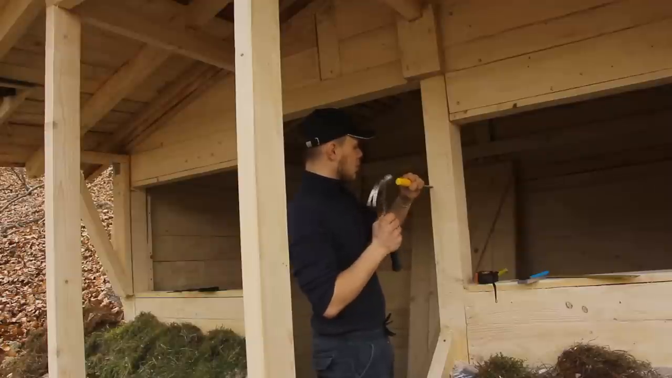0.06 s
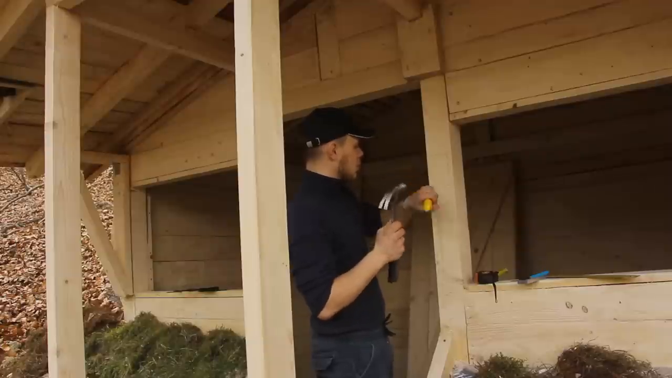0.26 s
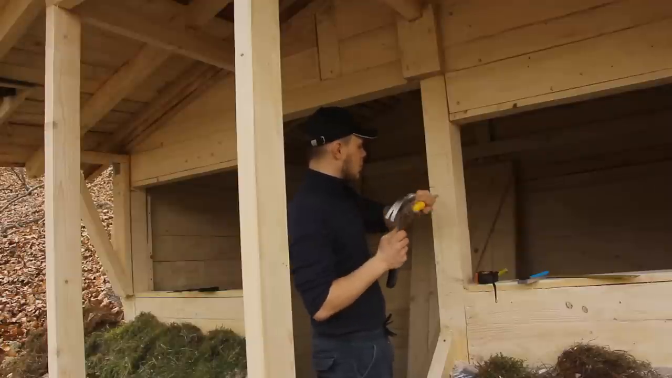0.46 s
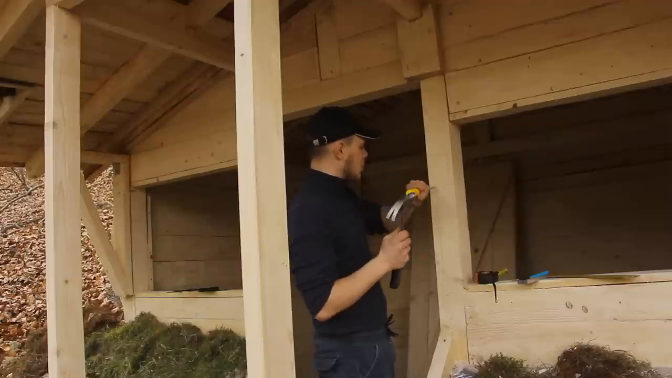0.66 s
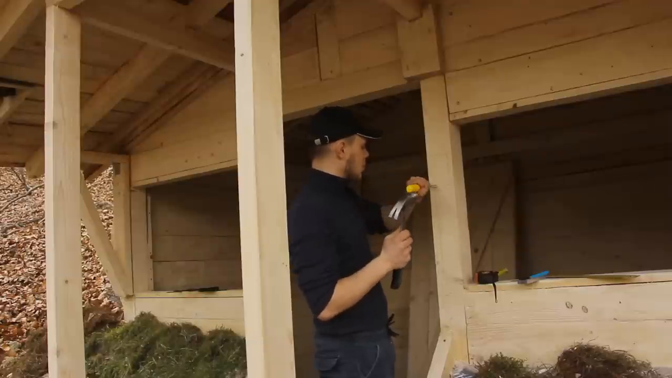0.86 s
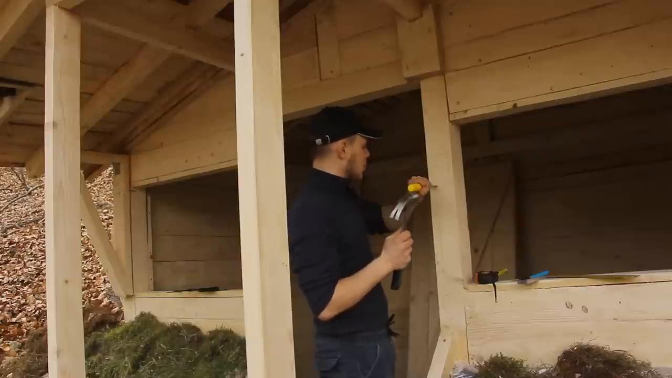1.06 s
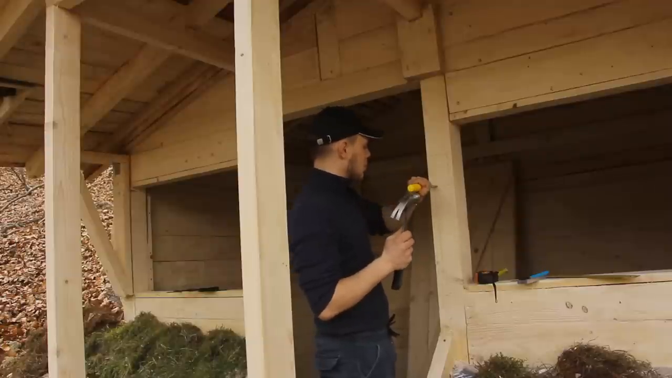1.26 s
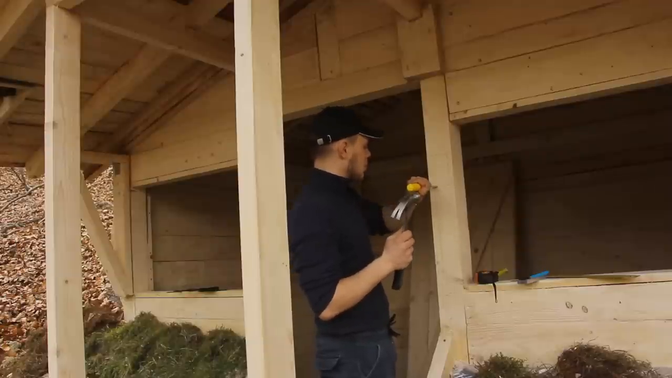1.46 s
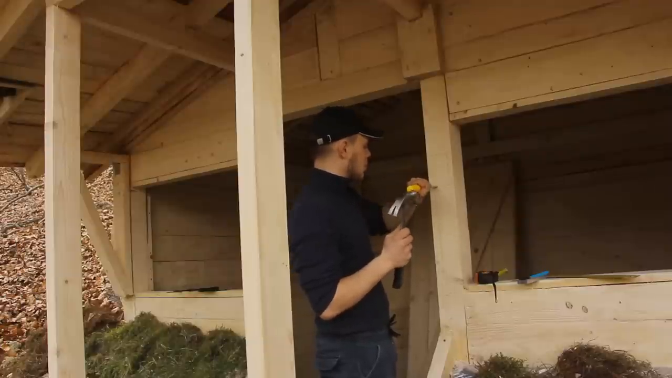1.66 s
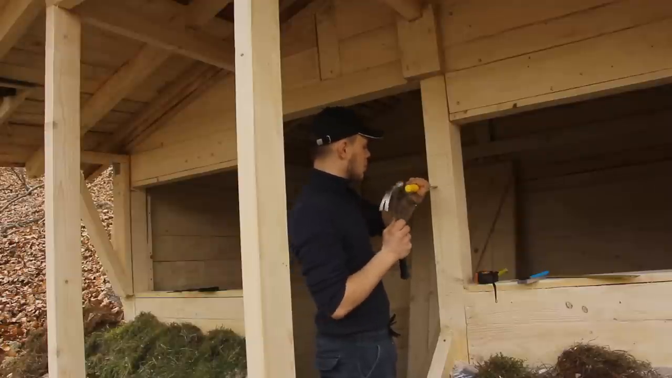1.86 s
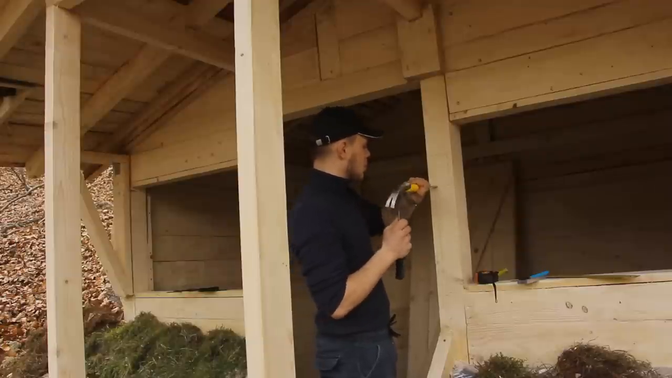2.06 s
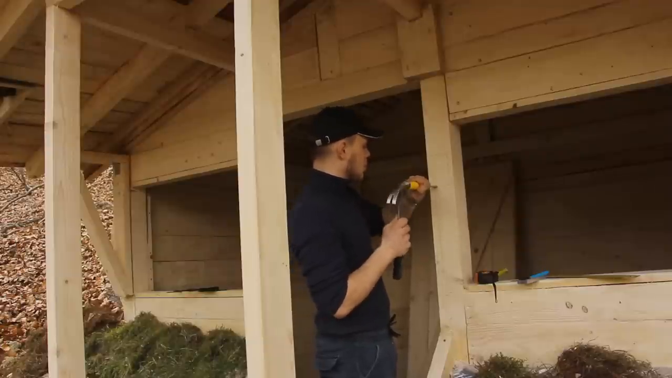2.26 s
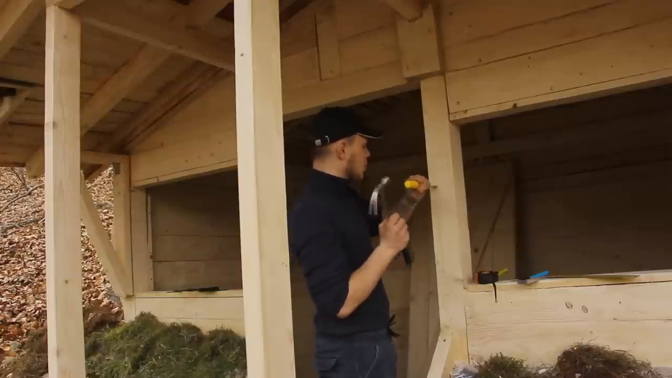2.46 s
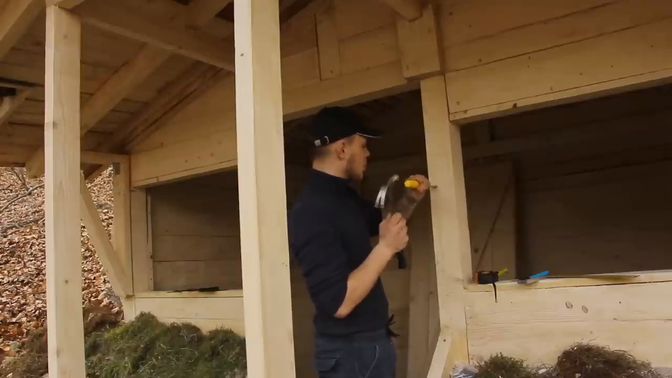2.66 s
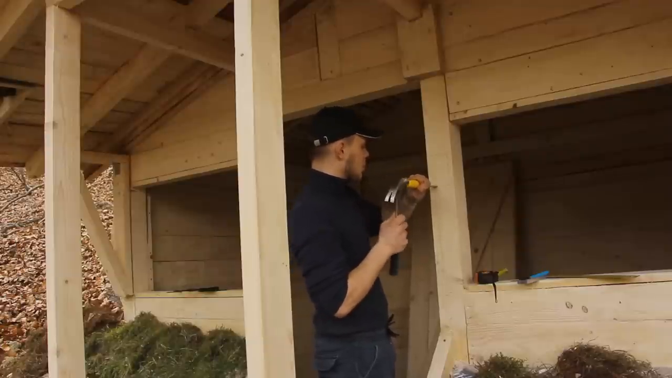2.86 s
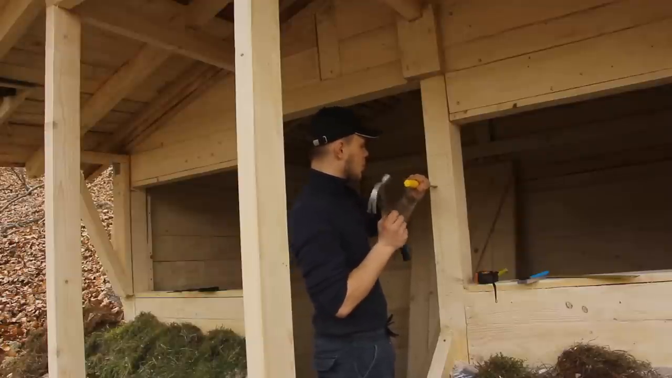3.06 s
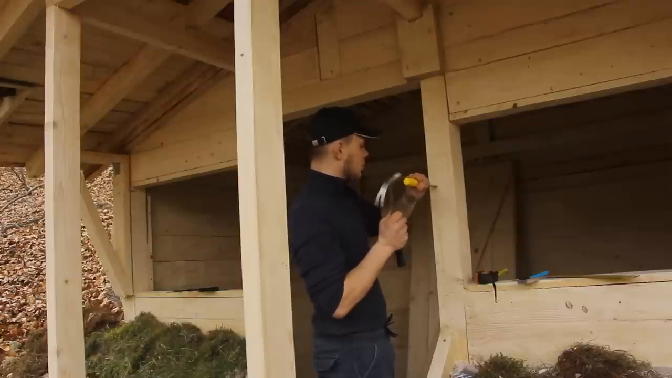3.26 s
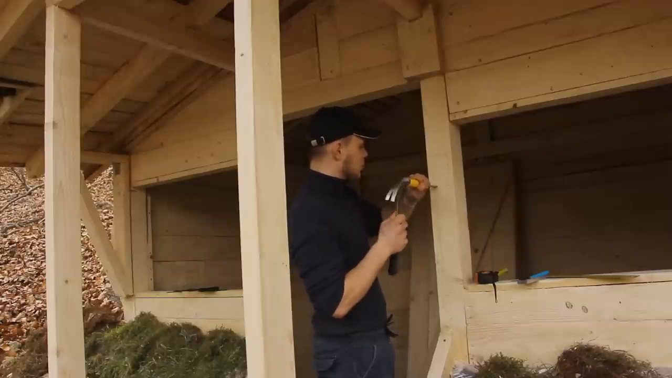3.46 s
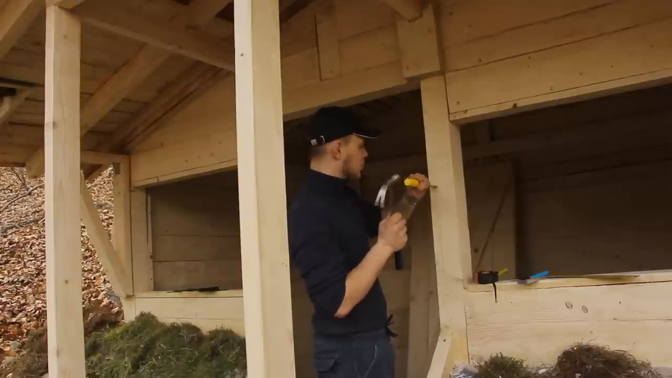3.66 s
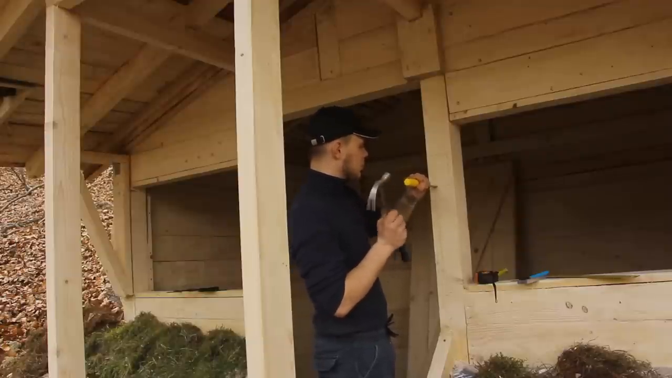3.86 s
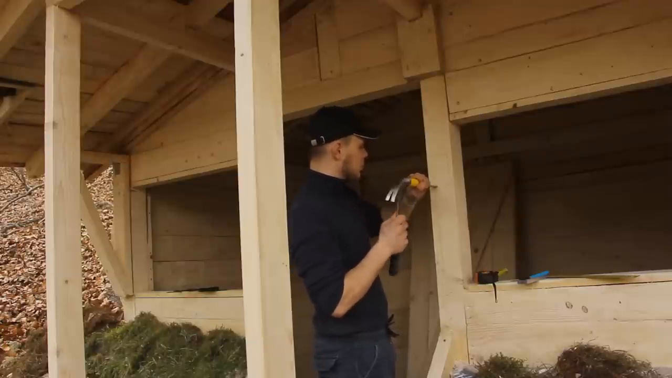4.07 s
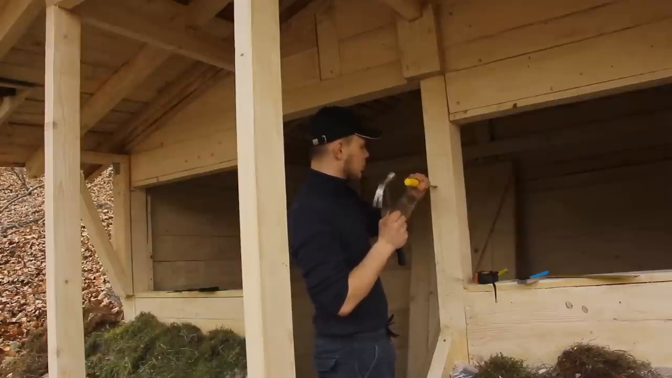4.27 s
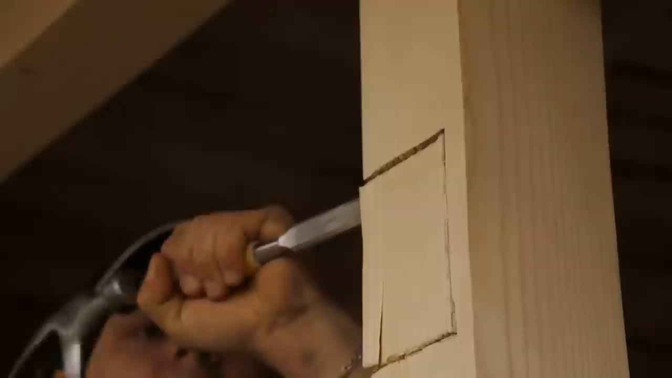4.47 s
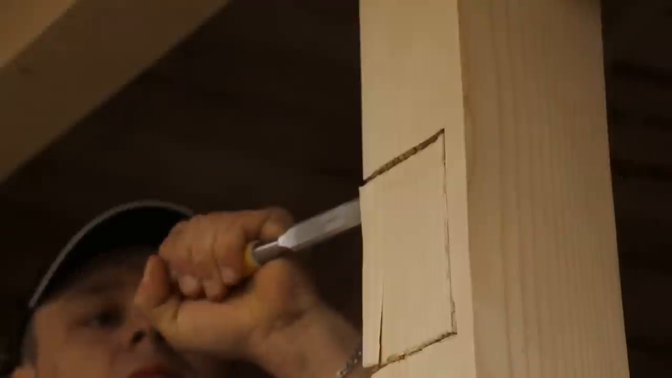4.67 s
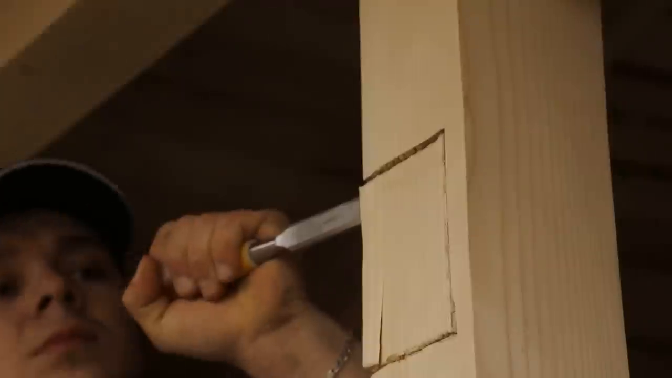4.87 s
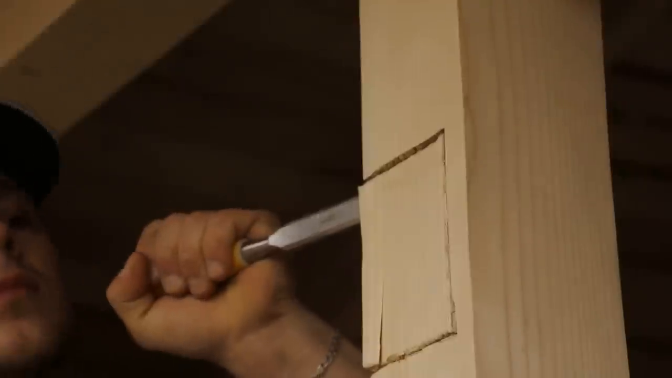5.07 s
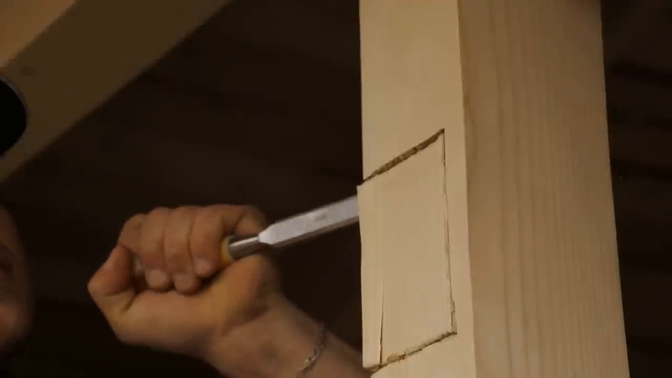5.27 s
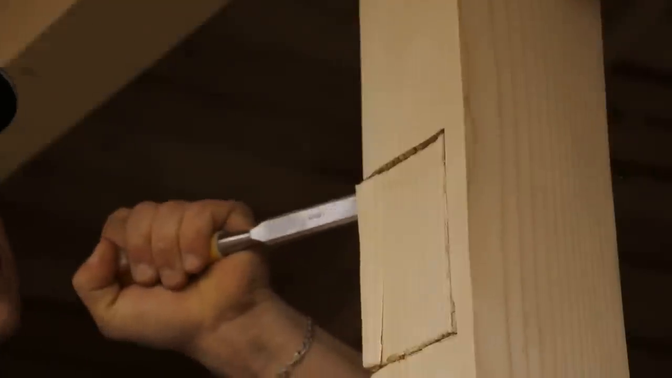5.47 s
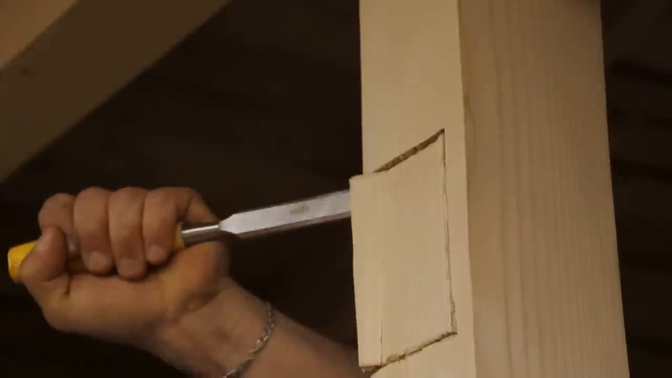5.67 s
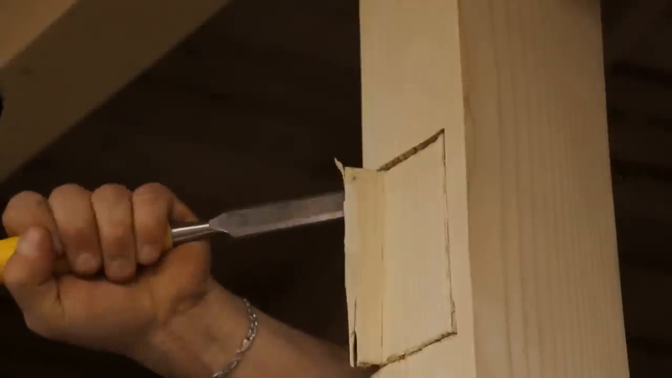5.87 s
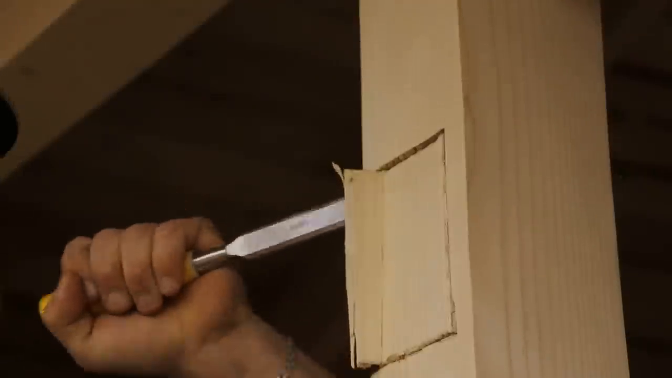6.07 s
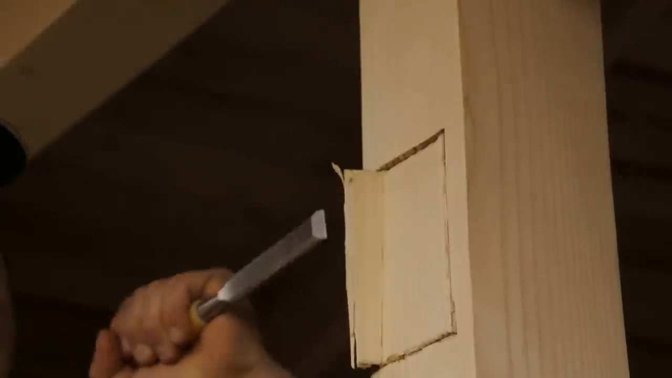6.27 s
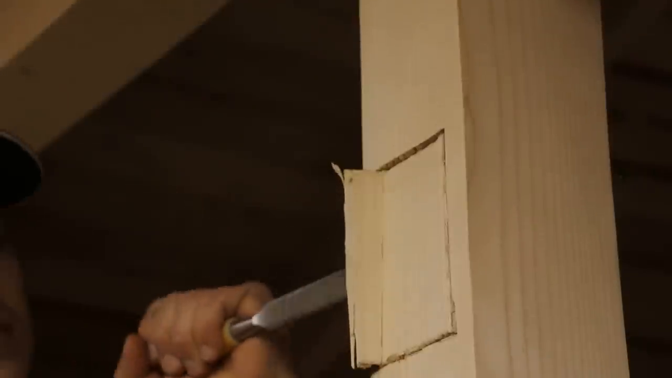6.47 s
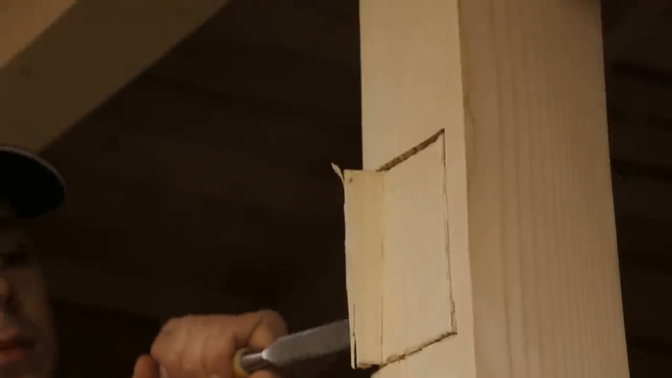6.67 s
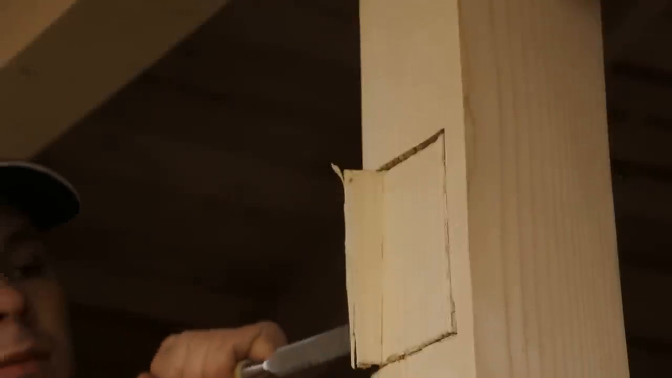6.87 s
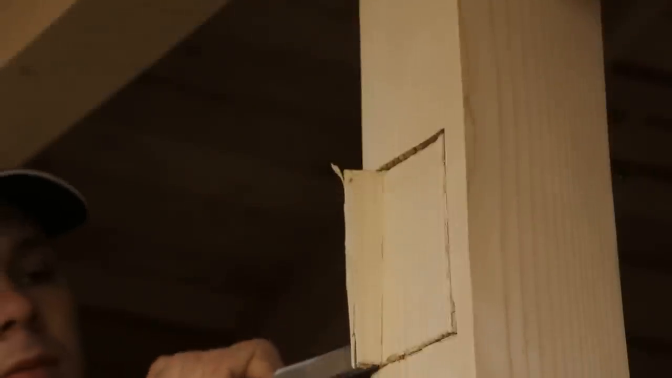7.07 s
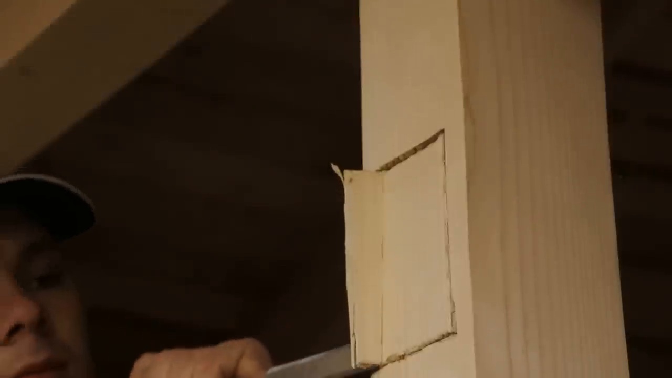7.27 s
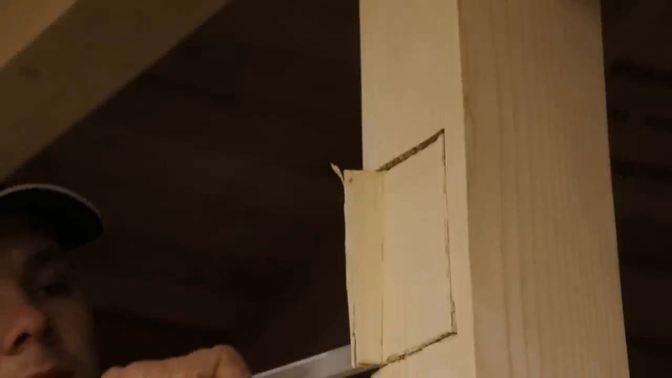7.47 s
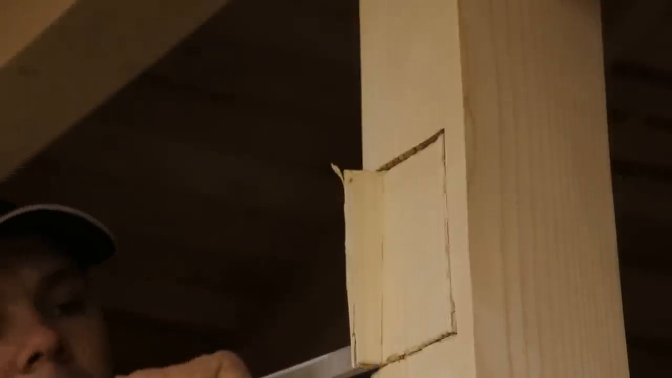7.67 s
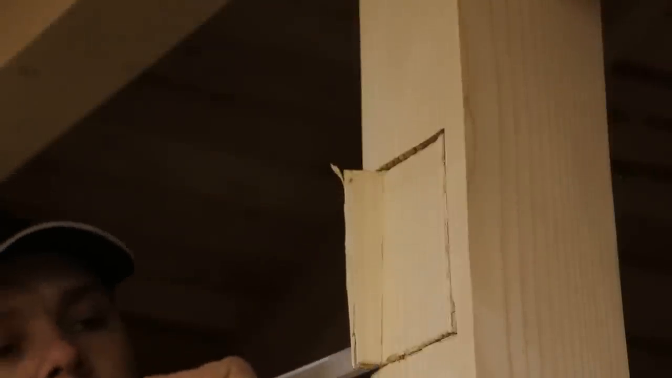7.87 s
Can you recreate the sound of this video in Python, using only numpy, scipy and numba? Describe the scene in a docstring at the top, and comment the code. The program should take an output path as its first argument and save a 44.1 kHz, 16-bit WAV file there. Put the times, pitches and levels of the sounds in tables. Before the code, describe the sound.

Outdoor air and a low distant engine hum, with sleeve rustles first. From two seconds come about nine woody, steel-edged hammer blows, roughly three a second, growing higher and harder, with short diffuse echoes from roof and boards. A pause, then bright splintering bursts of breaking fibre, closer sounding. Small handling bumps and a faint two-note bird call lead to a last low knock. Mono image, peaks hot and limited.

```python
"""In an open timber shelter, a hammer drives a chisel into a post: damped modes of post and blade,
with every blow setting the whole frame booming through beam modes and diffuse echoes.
The chisel then levers a slab loose, as noise bursts that crack over a fine crackle, and is struck once more.
Sleeve and tool rustle and bump; an engine hums in sines through the noise of open air, and birds call far off.
A limiter ducks after the loud knocks and their fronts clip; both channels are the same."""
import sys
import numpy as np
from scipy import signal
from scipy.fft import rfft, irfft
from scipy.io import wavfile
from numba import njit

SR = 44100
rng = np.random.default_rng(int(sys.argv[2]) if len(sys.argv) > 2 else 0)


def digitize_waveform(pressure):
    """Quantize a signal to 16-bit integers and store it at the path in sys.argv[1].

    Rows of a 2-D input are taken as channels; values are limited to [-1, 1].
    """
    field = np.atleast_2d(pressure).T
    bounded = np.clip(field, -1, 1)
    quanta = np.round(bounded * 32767).astype(np.int16)
    wavfile.write(sys.argv[1], SR, quanta)


N = 349713
TIME = np.arange(N) / SR
RING = TIME[:SR]  # one second, the span of every impulse response

# hammer blows, the body pitch climbing in the main series as the blade sinks in;
# the row at 4.499 s is no full blow: almost only a ringing tail is heard, its direct knock very faint
# [t/s, force level/dB, frame level/dB, hardness/dB, body f/Hz]
BLOWS = [(-.06, 0, -0.5, -7, 1200), (2.043, -5.5, -1.5, 1, 924), (2.3528, -8.5, 5.5, 0, 960),
         (2.6424, -2.5, 2, -0.5, 945), (2.947, -1.5, 2, 0, 1070), (3.2409, 2.5, -2.5, -9.5, 1320),
         (3.5197, 1.5, -1.5, -3, 1310), (3.8049, 1.5, 0, -6.5, 1290), (4.0907, 1.5, -1.5, -7, 1340),
         (4.3920, 6.5, 2, -4.5, 1344), (4.499, -30.5, 21, 8, 503), (7.8138, -2.5, -5, -7, 400)]
# modes of the post under the blade [f/Hz, level/dB, t60/s]
POST_MODES = [(154.5, -24.5, 0.052), (379, -28.5, 0.029), (587, -15, 0.045), (685, -0.5, 0.013),
              (800, -12, 0.023), (1051, 3.5, 0.0091), (1467, -23, 0.077), (1973, -3.5, 0.011),
              (2400, -6, 0.01), (2902, -2, 0.008), (3840, -0.5, 0.0092), (4717, -4, 0.01),
              (5398, -4, 0.012)]
# modes of the chisel in the fist [f/Hz, level/dB, t60/s]
CHISEL_MODES = [(1544, 0, 0.022), (3092, -0.5, 0.012)]
# modes of the shelter's beams and boards [f/Hz, level/dB]
FRAME_MODES = [(123.8, -38), (183.0, -42), (247.6, -36), (446.8, -37.5), (565.2, -63), (802.1, -45.5),
               (920.5, -36.5), (1066, -50.5), (1324, -44), (1567, -42)]
# spectrum of the shelter's diffuse ring [f/Hz, level per Hz/dB]
SHELTER_SPECTRUM = [(30, -43), (90, -3), (130, 6), (300, 1.5), (650, -3), (950, -1), (1580, -12),
                    (1800, -10.5), (3100, -14.5), (5700, -19), (8000, -32.5), (15000, -37)]
# decay of the diffuse ring [f/Hz, t60/s]
SHELTER_DECAY = [(60, 0.48), (250, 0.58), (1000, 0.49), (6000, 0.41), (14000, 0.083)]
# bright snap of steel on the handle [f/Hz, level per Hz/dB]
SNAP_SPECTRUM = [(300, 10.5), (1500, -16), (3000, 4.5), (5700, 3.5), (7500, -44), (15000, -15.5)]
# open air in the earlier, wider-sounding part [f/Hz, level per Hz/dB]
EARLY_AIR = [(25, -10), (130, 9), (290, -4.5), (480, 4), (700, 2), (1900, -5), (6000, -13), (15000, -21.5)]
# open air in the later, closer-sounding part [f/Hz, level per Hz/dB]
LATE_AIR = [(25, -5.5), (130, -8), (250, -8.5), (450, -6), (650, -7), (1600, -7.5), (5000, -16),
            (15000, -23)]
# far engine, easing off [t/s, firing rate f/Hz, level/dB]
ENGINE = [(0.45, 146.1, -52), (1.024, 159.2, -51), (1.446, 146.0, -51), (2.0, 149.2, -50),
          (4.9, 130.8, -53.5), (6.98, 134, -60), (7.6, 133.2, -65.5)]
# brief rustles and scrapes [t/s, length/s, level/dB]
SCRAPES = [(0.255, 0.16, -47.5), (0.424, 0.059, -47), (0.61, 0.2, -51.5), (0.828, 0.066, -45.5),
           (1.205, 0.066, -49), (1.371, 0.11, -46.5), (1.697, 0.058, -49.5), (1.908, 0.11, -44),
           (6.183, 0.033, -39.5), (7.136, 0.02, -38.5)]
# soft bumps against the timber [t/s, peak level/dB, f/Hz]
BUMPS = [(1.096, -31, 218), (6.166, -42.5, 145), (6.607, -32.5, 260), (6.758, -32, 224), (7.126, -34, 170),
         (7.632, -40.5, 462)]
# thin whistles of small birds [t/s, length/s, level/dB, f/Hz]
WHISTLES = [(1.104, 0.1, -62, 3800), (1.57, 0.13, -59, 3610), (4.663, 0.16, -49, 2500)]
# notes of a far bird call [t/s, length/s, level/dB, f/Hz]
CALL_NOTES = [(7.288, 0.15, -55.5, 724), (7.72, 0.44, -54, 769)]
# pushes on the chisel as a lever [t/s, length/s, level of the fine crackle/dB]
PUSHES = [(5.055, 0.16, -47.5), (5.213, 0.082, -35.5), (5.386, 0.12, -29), (5.59, 0.16, -30.5),
          (5.857, 0.076, -32)]
# the big fibre bundles breaking [t/s, level/dB, f/Hz]
CRACKS = [(5.1781, -16.5, 4260), (5.315, -11.5, 4200), (5.3205, -3.5, 5670), (5.356, -0.5, 3790),
          (5.392, 1.5, 3750), (5.5414, -4, 5390), (5.5633, 4, 1930), (5.5886, 3, 4940),
          (5.6066, -4.5, 4830), (5.6126, -3, 3570), (5.6371, -2.5, 4040), (5.692, -11.5, 5600),
          (5.8111, -9.5, 2030), (5.8268, -10, 4810), (5.8483, 6, 4760), (5.8718, -3.5, 5000),
          (5.8897, 2, 2860), (5.9352, -9.5, 5200), (5.9623, -8, 11000)]
# spectrum of the loosening slab [f/Hz, level per Hz/dB]
SLAB_SPECTRUM = [(300, -15), (410, 9.5), (650, -15.5), (800, -2.5), (1200, -2), (1950, -1.5), (2600, -6.5),
                 (3800, -1.5), (5800, -5), (7000, -9.5), (11000, -8.5), (16000, -16)]

EARLY_AIR_DB, LATE_AIR_DB = -48, -51
BODY_DB = 7.5  # lift of the wood at the body pitch
# a firmly seated chisel rings freely; below this body pitch it sits loose and rings more weakly
SEATED_HZ, RING_DB, LOOSE_DB_PER_OCTAVE = 880, 1, 11
# from this time the sound is closer and the low sway of the roof is faint
FAINT_SWAY_S, FAINT_SWAY_DB = 4.33, -15
# centre of a scrape of this length; quicker ones are brighter by this power of the length ratio
SCRAPE_HZ, SCRAPE_S, QUICK_BRIGHTENING = 5050, 0.066, 0.17
OCTAVE_LAG_S, OCTAVE_DB = 0.11, 3  # the octave takes over as the beak opens
# strands follow within this delay, on average this much weaker, up to this far either side in pitch
STRANDS_WITHIN_S, STRAND_DB, STRAND_OCTAVES = 0.0067, -16.5, 0.28
TOP_HZ = 15900  # upper edge of the passband


def undb(db):
    """Decibels express a logarithm of amplitude; this returns the gain."""
    return 10 ** (np.asarray(db) / 20)


def unit(x):
    """Normalisation to rms 1 makes a later gain the absolute level."""
    return x / np.sqrt(np.mean(x ** 2))


def curves(rows):
    """Linear interpolation in time of the columns of a table."""
    s, *columns = np.transpose(rows)
    return [np.interp(TIME, s, c) for c in columns]


def at_pitch(points, hz):
    """Interpolation of (f, value) points on a logarithmic frequency axis."""
    f, value = np.transpose(points)
    return np.interp(np.log(np.maximum(hz, 1)), np.log(f), value)


def colour(x, points):
    """Spectral shaping: each Fourier component is scaled by the (f, level) curve."""
    gain = undb(at_pitch(points, np.fft.rfftfreq(len(x), 1 / SR)))
    return irfft(rfft(x) * gain, len(x))


def noise(points, size):
    """Gaussian noise of rms 1 with a prescribed spectrum."""
    return unit(colour(rng.standard_normal(size), points))


def resonate(x, hz, q):
    """Two-pole resonance of gain 1 at its centre."""
    return signal.lfilter(*signal.iirpeak(min(hz, SR / 4), max(q, 2 / 3), SR), x)


def high_pass(x, hz):
    """First-order high-pass filtering, a gentle cut of the bass."""
    return signal.lfilter(*signal.butter(1, min(hz, SR / 3), "high", fs=SR), x)


def fade(t60):
    """Exponential decay by 60 dB in t60 seconds."""
    return np.exp(-np.log(1000) * RING / t60)


def mode(hz, t60, build_cycles):
    """A struck resonance: a damped sine that takes some cycles to build up."""
    return np.sin(2 * np.pi * hz * RING) * fade(t60) * (1 - np.exp(-RING * hz / build_cycles))


def swell(s, length):
    """Gaussian envelope centred on time s, of equivalent width length."""
    return np.exp(-np.pi * ((TIME - s) / length) ** 2)


def waver(rate):
    """Random modulation of rms 1: straight lines between random knots, rate of them a second."""
    knots = rng.standard_normal(int(N / SR * rate) + 2)
    return unit(np.interp(TIME * rate, np.arange(len(knots)), knots))


def tone(hz):
    """Frequency modulation: a sine of rms 1 whose phase integrates a pitch curve."""
    return np.sqrt(2) * np.sin(2 * np.pi * np.cumsum(hz) / SR)


def reverberate(x, response):
    """Convolution with an impulse response of unit energy."""
    return signal.fftconvolve(x, response / np.linalg.norm(response))[:len(x)]


def add(out, s, x):
    """Superposition: x is summed into out from time s."""
    i = int(round(s * SR))
    x = x[max(-i, 0):N - i]
    out[max(i, 0):max(i, 0) + len(x)] += x


def shelter():
    """Diffuse reverberation of roof and walls: dense echoes whose treble dies first."""
    hz, s, cells = signal.stft(noise(SHELTER_SPECTRUM, size=SR), SR, nperseg=2 ** 8)
    decay = np.exp(-np.log(1000) * s / at_pitch(SHELTER_DECAY, hz)[:, None])
    echoes = signal.istft(cells * decay, SR)[1][:SR]
    # the nearest beams answer first and loudest
    return echoes * (1 - np.exp(-RING / 0.00055)) * (1 + 2.4 * fade(0.069))


def frame():
    """Modal response of the beams and boards; the low modes ring slightly longer."""
    return sum(undb(db) * mode(hz, 0.45 * (200 / hz) ** 0.03, build_cycles=0.37)
               for hz, db in FRAME_MODES)


def struck_post():
    """Modal excitation of the post; level and pitch of each mode vary a little from blow to blow."""
    post = np.zeros(SR)
    for hz, db, t60 in POST_MODES:
        level_db, detune = rng.standard_normal(2) * [1.5, 0.006]
        post += undb(db + level_db) * mode(hz * (1 + detune), t60, build_cycles=1.29)
    return post


def struck_chisel(body_hz):
    """Modal ringing of the blade, which weakens when the blade is loosely seated."""
    octaves_loose = max(np.log2(SEATED_HZ / body_hz), 0)
    ring_db = RING_DB - LOOSE_DB_PER_OCTAVE * octaves_loose
    return sum(undb(db + ring_db) * mode(hz, t60, build_cycles=1.0) for hz, db, t60 in CHISEL_MODES)


def handle_snap():
    """Impact noise of steel on the handle, a coloured burst with a rapid onset and decay."""
    return undb(-1) * noise(SNAP_SPECTRUM, size=SR) * fade(0.011) * (1 - np.exp(-RING / 0.00022))


def hammer(echoes):
    """Impact and structural transmission: each blow rings chisel and post and spreads through the frame."""
    out, roof = np.zeros(N), np.zeros(N)
    sway = undb(-27.0) * mode(42.0, 0.99, build_cycles=5.4)  # the roof swings up slowly
    beams = undb(14.5) * frame()
    for s, force_db, frame_db, hard_db, body_hz in BLOWS:
        # the knock itself carries little bass
        knock = undb(9.5) * high_pass(struck_post() + struck_chisel(body_hz) + handle_snap(), 320)
        # the depth and place of the cut favour one band of the wood
        knock = knock + (undb(BODY_DB) - 1) * resonate(knock, body_hz, q=9.9)
        # the walls return the knock in its own colour, while the shaken boards add a dense wash
        room = undb(-12.5) * reverberate(high_pass(knock, 680), shelter())
        boards = undb(-16.5) * (echoes + 0.5 * shelter())
        blow = knock + room + undb(frame_db) * (beams + boards)
        # a harder contact lifts the treble
        blow = blow + (undb(hard_db) - 1) * resonate(blow, 4480, q=1.0)
        add(out, s, undb(force_db) * blow)
        add(roof, s, undb(force_db + frame_db) * sway)
    faintness = np.clip((TIME - FAINT_SWAY_S) / 0.05, 0, 1)
    return out + roof * undb(FAINT_SWAY_DB * faintness)


def open_air():
    """Broadband ambient noise, cross-faded from a wider-sounding to a closer-sounding spectrum."""
    late = np.clip((TIME - 4.4) / 0.7, 0, 1)
    early_air = undb(EARLY_AIR_DB) * noise(EARLY_AIR, size=N)
    late_air = undb(LATE_AIR_DB) * noise(LATE_AIR, size=N)
    return ((1 - late) * early_air + late * late_air) * undb(0.18 * waver(rate=7.6))


def far_engine():
    """Periodic firing heard as a sine at the firing rate and its third harmonic, both unsteady."""
    hz, db = curves(ENGINE)
    hz = hz * (1 + 0.0027 * waver(rate=27))
    third = undb(-12.0 + 3.5 * waver(rate=11)) * tone(3 * hz)
    return undb(db + 0.72 * waver(rate=17)) * (tone(hz) + third)


def scrapes():
    """Friction of sleeve and blade: grainy noise through a resonance that is higher in quick strokes."""
    out = np.zeros(N)
    for s, length, db in SCRAPES:
        hz = SCRAPE_HZ * (SCRAPE_S / length) ** QUICK_BRIGHTENING
        grain = rng.standard_normal(N) * undb(7.1 * rng.standard_normal(N))
        rustle = resonate(resonate(grain, hz, q=0.9), hz, q=0.9)
        out += undb(db) * swell(s, length) * unit(rustle)
    return out


def bumps(echoes):
    """Soft contact of hand and tool excites one dull band of the timber's response."""
    out = np.zeros(N)
    timber = (echoes + undb(30.0) * frame()) * fade(0.65)
    for s, db, hz in BUMPS:
        bump = resonate(timber, hz, q=1.5)
        add(out, s, undb(db) * bump / np.abs(bump).max())
    return out


def whistles():
    """Nearly pure tones of small birds, with a fast random frequency modulation."""
    return sum(undb(db) * swell(s, length) * tone(hz * (1 + 0.0123 * waver(rate=290)))
               for s, length, db, hz in WHISTLES)


def bird_call():
    """A drawn-out call that steps up in pitch; in each note the octave follows the fundamental."""
    out = np.zeros(N)
    for s, length, db, hz in CALL_NOTES:
        pitch = hz * (1 + 0.0067 * waver(rate=67))
        fundamental = swell(s, length) * tone(pitch)
        octave = undb(OCTAVE_DB) * swell(s + OCTAVE_LAG_S, length) * tone(2 * pitch)
        out += undb(db) * (fundamental + octave)
    return out


def birds():
    """Amplitude fluctuation over distance: whistles and call flutter together."""
    return (whistles() + bird_call()) * undb(3 * waver(rate=36))


def fine_crackle():
    """Random impulses of straining fibres, coloured and gated by each push on the lever."""
    strain = sum(undb(db) * swell(s, length) for s, length, db in PUSHES)
    snaps = rng.random(N) < 2600 / SR  # 2600 fibres a second on average
    sizes = undb(3.7 * np.minimum(rng.exponential(size=N), 4))
    fibres = snaps * rng.standard_normal(N) * sizes
    crackle = colour(fibres, [(400, -44), (2900, -8.5), (4000, 3), (5800, 1.5), (8000, -7.5),
                              (12000, -7.5), (16000, -23)])
    return strain * unit(crackle)


def breaks(count=2):
    """Cascading fracture: each big break takes thinner strands with it, as (t/s, level/dB, f/Hz)."""
    for s, db, hz in CRACKS:
        yield s, db, hz
        for late, size, pitch in rng.random((count, 3)):
            strand_s = s + STRANDS_WITHIN_S * late
            strand_db = db + STRAND_DB * (0.5 + size)
            yield strand_s, strand_db, hz * 2 ** (STRAND_OCTAVES * (2 * pitch - 1))


def fracture(db, hz):
    """Sudden release of strain: a bundle tears, rings at its own pitch and jolts the post."""
    tear = noise(SLAB_SPECTRUM, size=SR) * (0.32 * fade(0.014) + 0.061 * fade(0.073))
    tear = tear + 0.74 * resonate(tear, hz, q=2.8) + 0.64 * mode(hz, 0.0089, build_cycles=0.47)
    tear = high_pass(tear, 0.6 * hz)  # thin bundles snap high and hardly move the slab
    tick = 0.1 * rng.standard_normal(SR) * fade(0.014)
    jolt = 0.0079 * undb(db) * fade(0.0049)  # only the big breaks shake the post
    return undb(db) * (tear + tick + jolt)


def splinters():
    """Fracture and reverberation: bundles snap over a fine crackle; slab and shelter ring with them."""
    out = fine_crackle()
    for s, db, hz in breaks():
        add(out, s, fracture(db, hz))
    return out + undb(-12.5) * reverberate(out, noise(SLAB_SPECTRUM, size=SR) * fade(0.38))


def scene():
    """Superposition of all sources, the same on both channels."""
    echoes = shelter()
    mono = hammer(echoes) + open_air() + far_engine()
    mono = mono + scrapes() + bumps(echoes) + birds() + splinters()
    return np.tile(mono, (2, 1))


@njit
def follow(x, attack, release):
    """Envelope following by a one-pole smoother that rises fast and sinks slowly."""
    out, e = np.empty(len(x)), 0.
    for i in range(len(x)):
        e += (x[i] - e) * (attack if x[i] > e else release)
        out[i] = e
    return out


def record(dry):
    """Limiting by a delayed envelope, too late to keep a knock's front from clipping; then a low-pass."""
    attack_s, release_s, limit_db = 0.003, 0.11, -6
    loud = follow(np.abs(dry[0]), 1 / (attack_s * SR), 1 / (release_s * SR))
    ducked = dry / np.maximum(loud / undb(limit_db), 1)
    clipped = np.clip(ducked, -1, 1)
    return signal.sosfilt(signal.ellip(8, 0.2, 70, TOP_HZ, fs=SR, output="sos"), clipped)


dry = scene()
out = record(dry)
digitize_waveform(out)
```